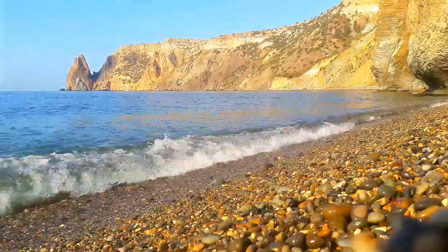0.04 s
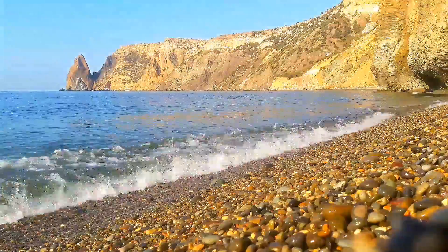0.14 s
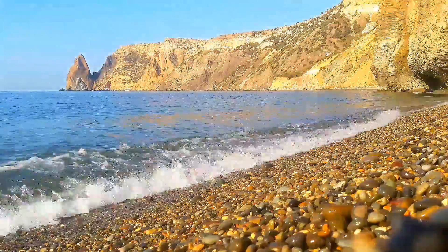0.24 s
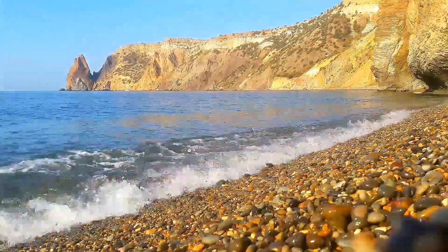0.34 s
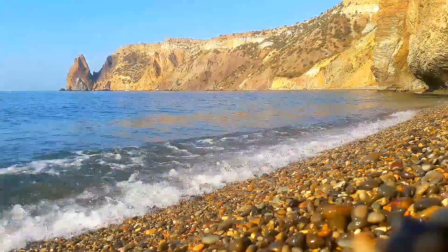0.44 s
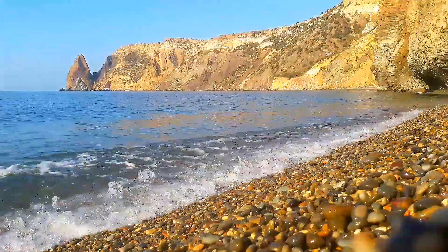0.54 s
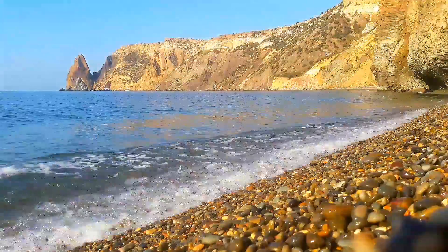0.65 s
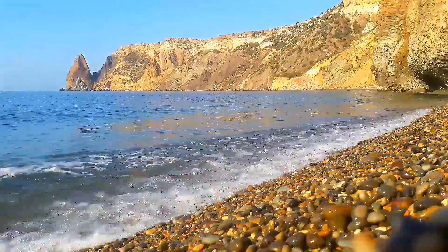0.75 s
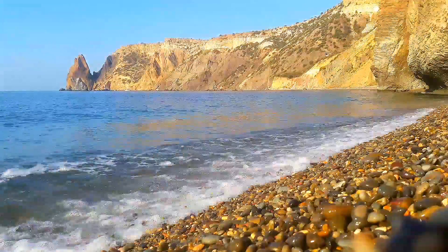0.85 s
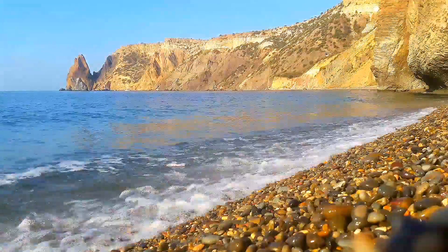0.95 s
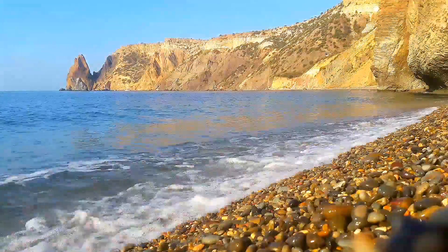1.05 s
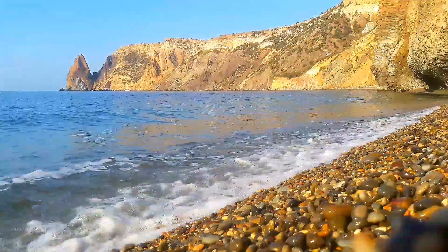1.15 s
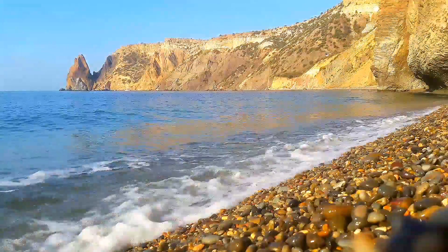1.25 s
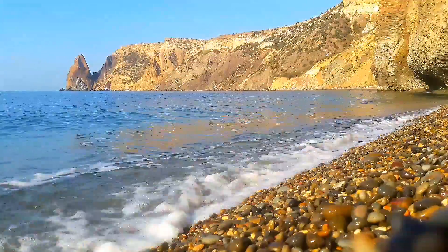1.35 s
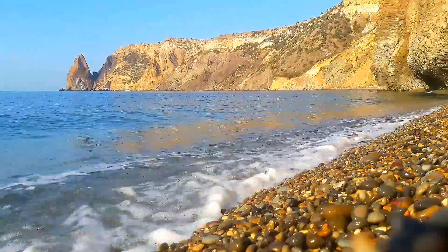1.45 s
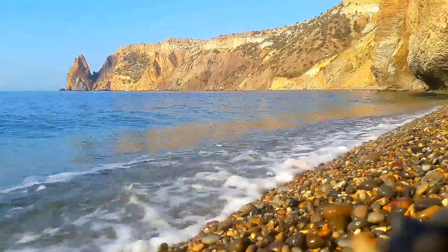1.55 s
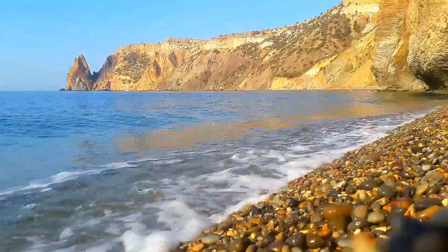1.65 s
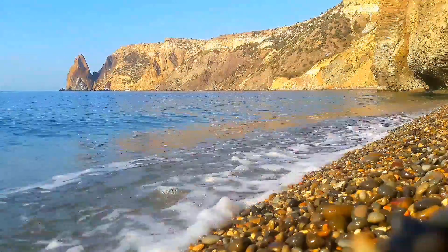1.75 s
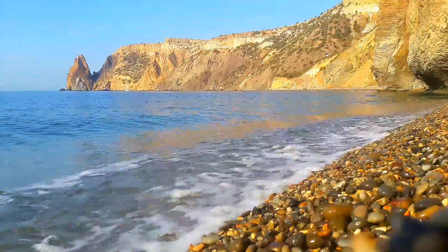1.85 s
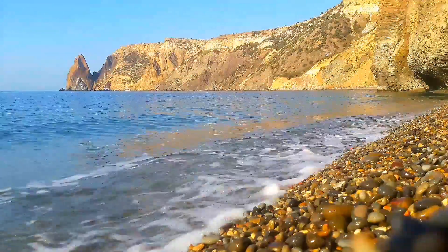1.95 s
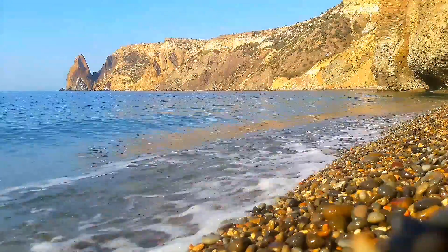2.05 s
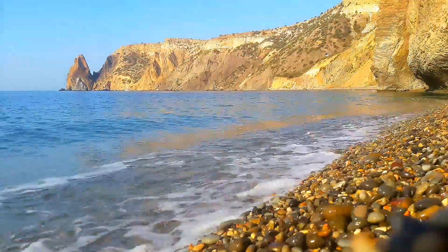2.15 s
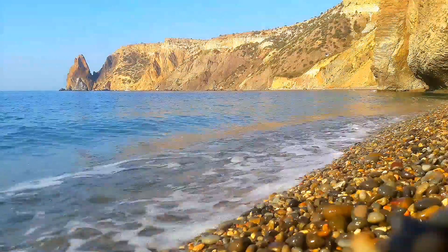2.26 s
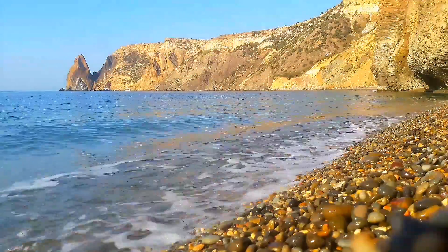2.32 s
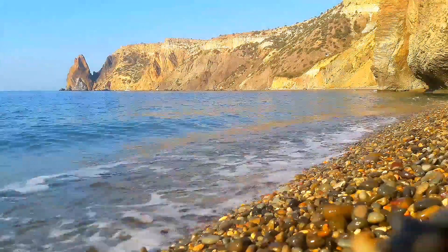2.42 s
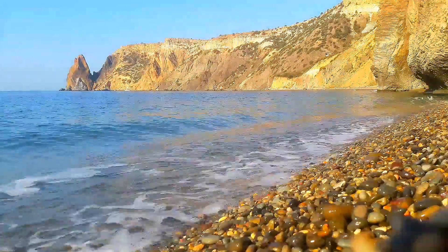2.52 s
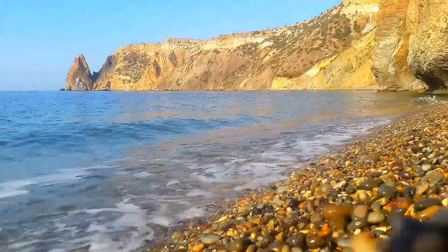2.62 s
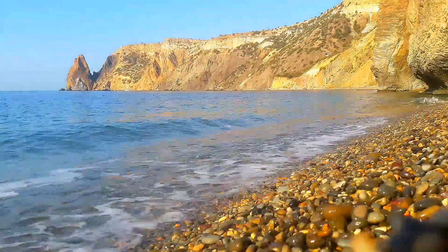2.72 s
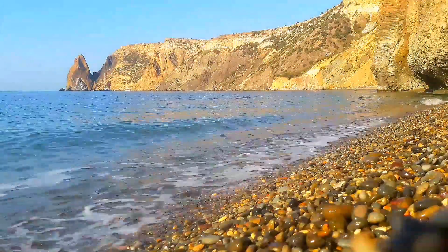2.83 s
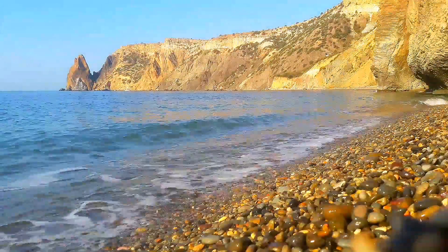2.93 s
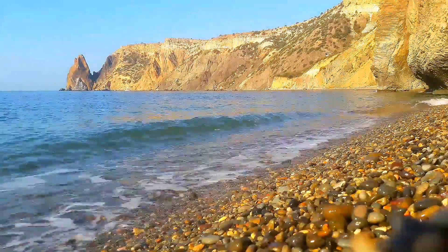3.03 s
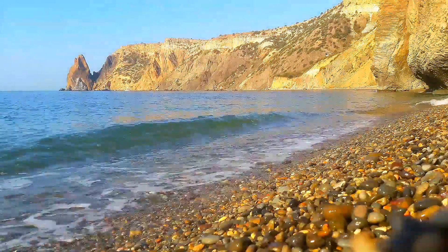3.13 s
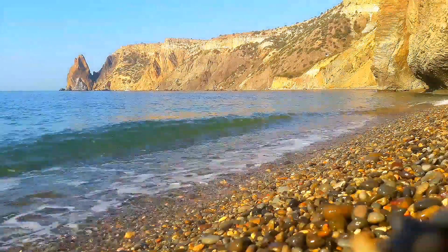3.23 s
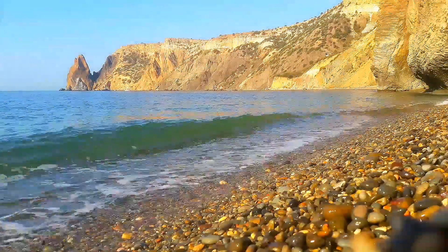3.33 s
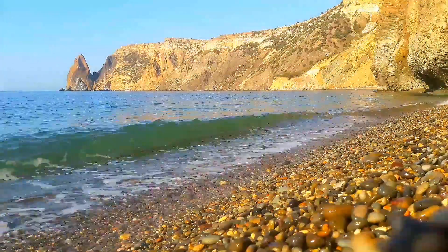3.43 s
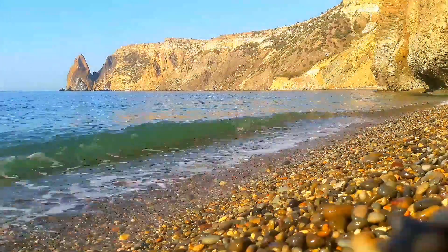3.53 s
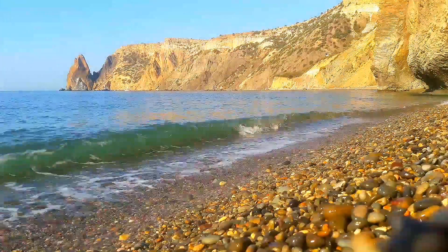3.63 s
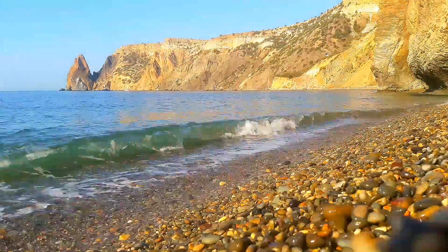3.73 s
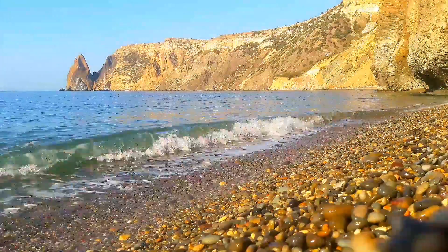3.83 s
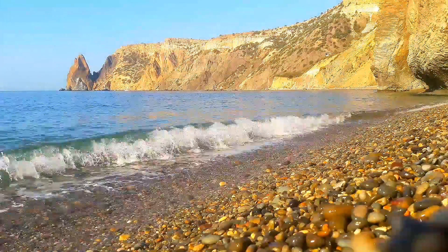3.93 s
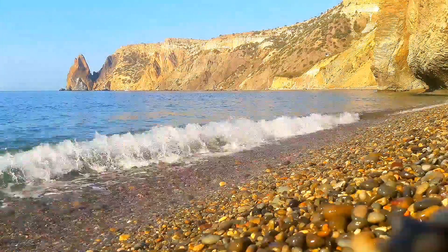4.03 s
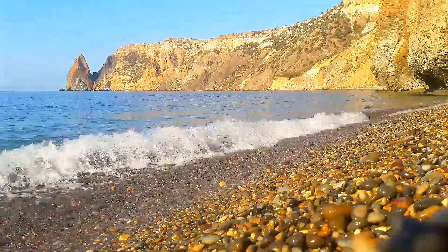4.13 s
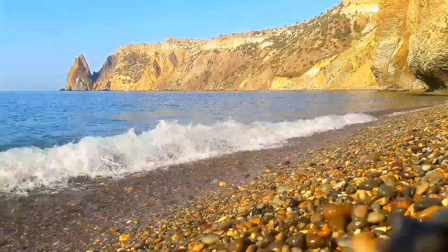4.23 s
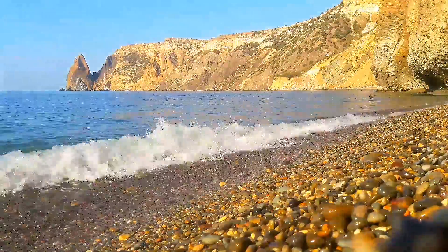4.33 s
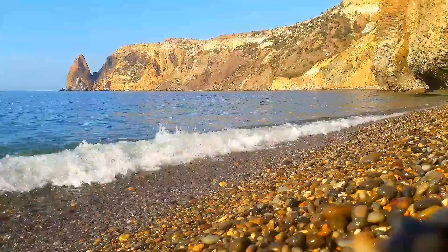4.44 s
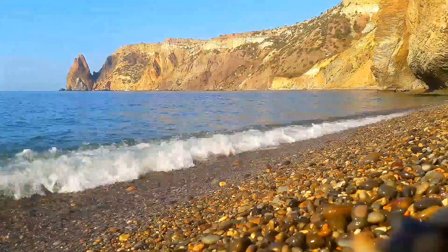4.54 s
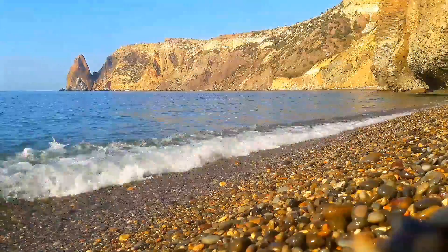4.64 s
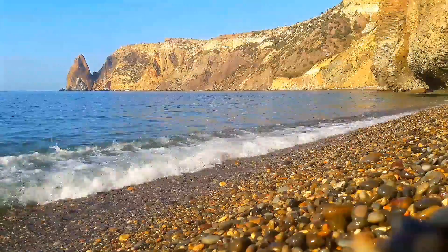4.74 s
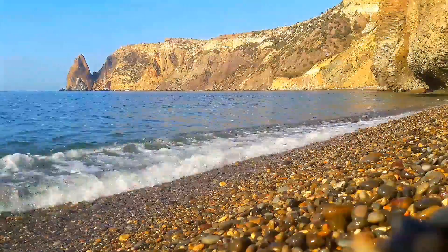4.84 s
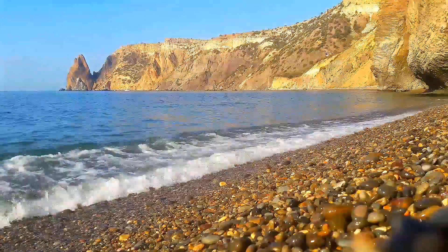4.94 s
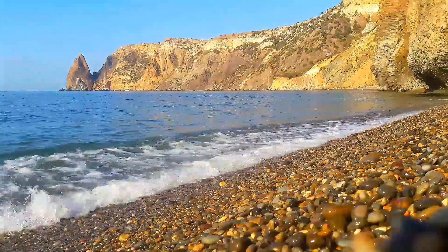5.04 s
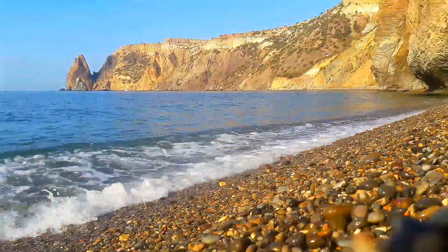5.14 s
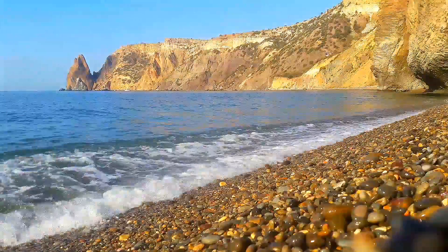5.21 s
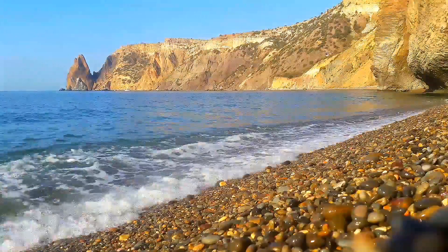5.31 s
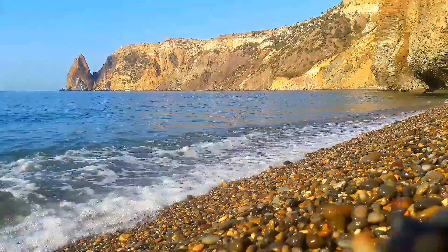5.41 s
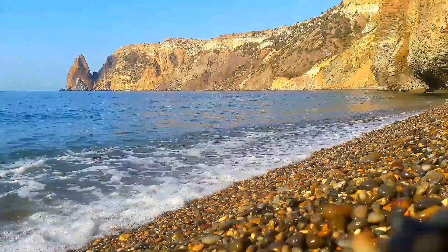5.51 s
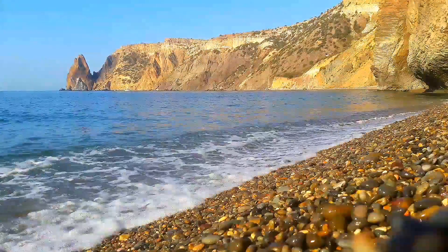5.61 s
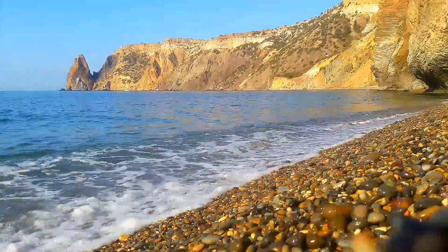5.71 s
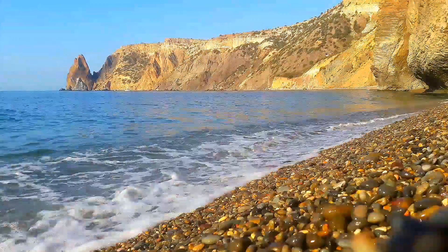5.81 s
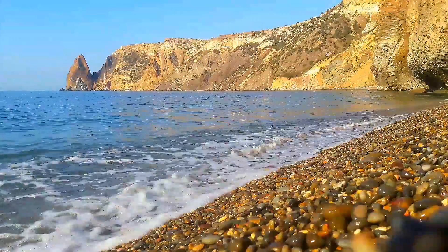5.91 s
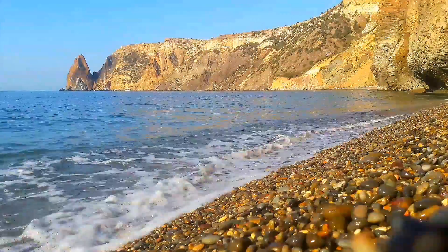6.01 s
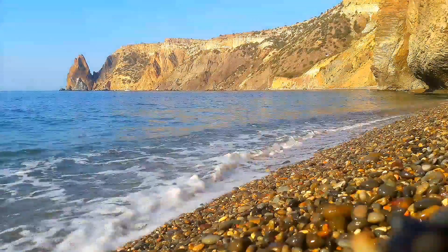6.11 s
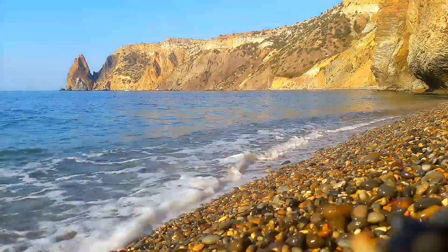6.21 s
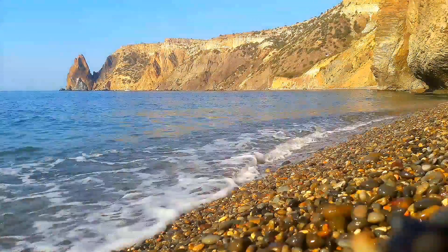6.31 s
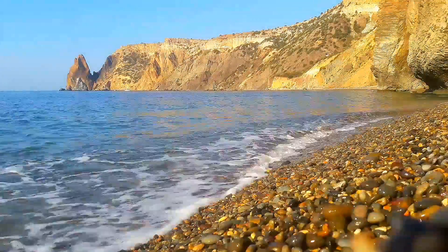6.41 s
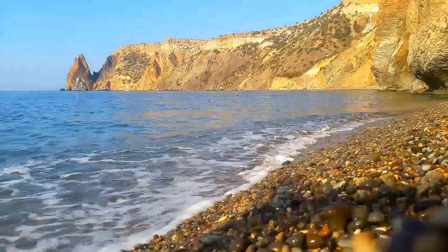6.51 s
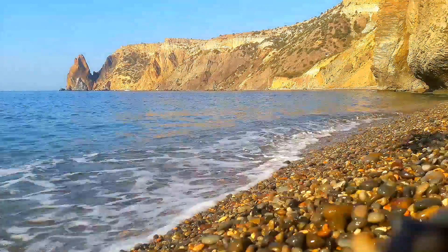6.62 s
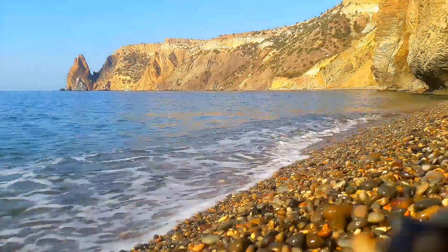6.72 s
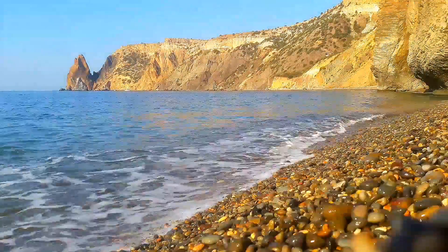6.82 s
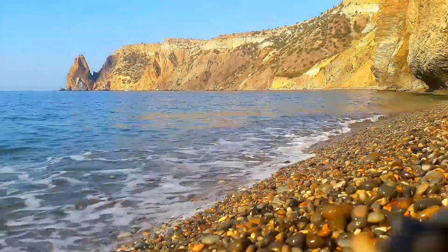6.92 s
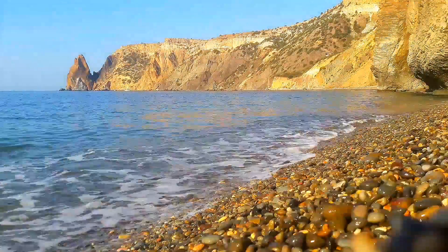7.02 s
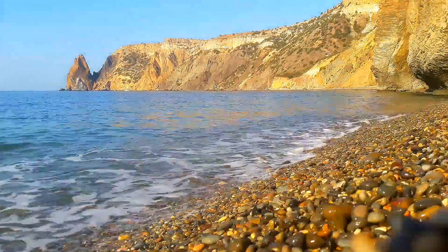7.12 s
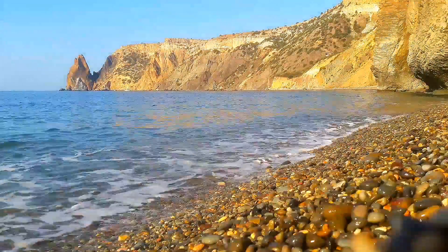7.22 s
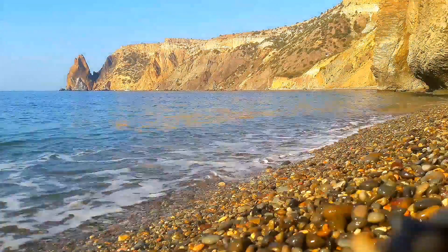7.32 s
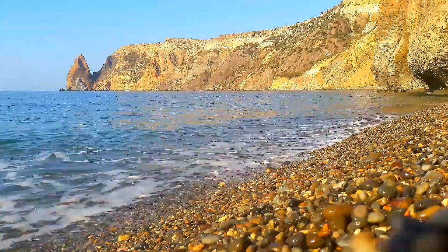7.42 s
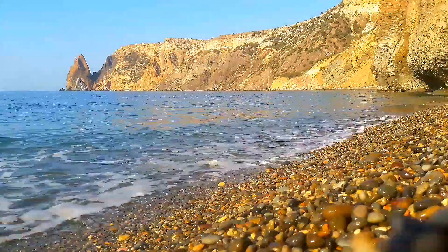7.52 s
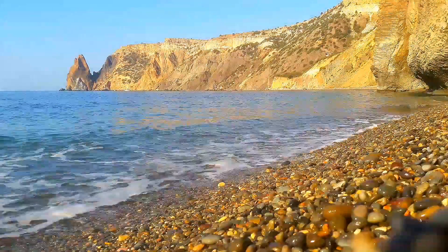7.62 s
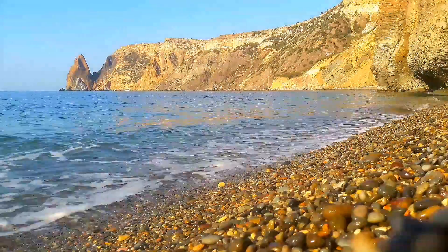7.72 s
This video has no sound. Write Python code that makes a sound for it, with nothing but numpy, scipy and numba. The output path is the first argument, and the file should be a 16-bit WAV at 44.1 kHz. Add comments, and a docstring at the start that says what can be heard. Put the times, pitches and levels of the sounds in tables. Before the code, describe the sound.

A small wave breaks on a steep pebble beach at once, with low thumps, a bubbly roar and hollow gulps. It surges again more softly, then drains with rattling pebbles and fizz. After a quiet lull, a second breaker crashes just past four seconds, washes up, and fades away. Outdoors, stereo microphone lying low on the stones, faint hiss.

```python
"""Steep pebble beach: small waves break a few metres to the left of a phone lying on the stones.
Breakers trap clouds of bubbles that roar over low thumps; large air pockets gulp.
The backwash drags pebbles that rattle and knock, foam fizzes, drops of spray tick, a faint wind rumbles.
Roar, rattle and fizz are swarms of short ringing grains, each from its own spot on the shore:
most reach the right port a little late. Microphone hiss and wind are filtered noise."""
import sys
import numpy as np
from scipy import signal
from scipy.fft import rfft, irfft, next_fast_len
from scipy.io import wavfile
from scipy.ndimage import uniform_filter1d
from numba import njit

SR = 44100
rng = np.random.default_rng(int(sys.argv[2]) if len(sys.argv) > 2 else 0)


def volts(x):
    """Linear amplitude factor 10**(x/20) for a level x in dB, scalar or array-like."""
    e = np.asarray(x, float) / 20
    return 10 ** e


def unload_audio(sound):
    """Save the sound as a 16-bit wav file, at the path given as the first command line argument."""
    columns = np.transpose(np.atleast_2d(sound))
    # keep every value between -1 and 1, then stretch to whole-number steps
    steps = np.round(np.clip(columns, -1, 1) * 32767)
    wavfile.write(sys.argv[1], SR, steps.astype(np.int16))


N = 342216  # samples
STEP = 32  # samples per control step


def breakers():
    """Trapped bubbles ring in a patchy roar, the falling crest thumps below, air pockets gulp as they close."""
    # crests falling on the stones: t/s, thump level/dB before flicker
    falls = [(.1, -32), (.21, -32), (.45, -38), (.67, -33.5), (1.25, -39.5), (1.42, -43.5), (2.1, -45),
             (2.55, -38.5), (3.02, -45), (3.84, -32.5), (3.95, -37), (4.08, -33.5), (4.23, -22.5),
             (4.42, -31), (5.17, -34), (5.73, -51.5), (6.25, -47), (6.5, -45), (6.649, -42.5),
             (6.85, -41.5), (7.15, -48), (7.45, -51.5), (7.7, -45.5)]
    # large air pockets closing: t/s, level/dB, starting f/Hz, cycles/1, rise/1 (f ends 1 + 0.69 rise times higher)
    gulps = [(.228, -18.5, 397, 13.4, .1), (.236, -24, 1040, 15.3, .1), (0.454, -21, 205, 9.8, .1),
             (0.504, -28.5, 320, 8.4, .05), (.532, -22.5, 298.5, 39, 0.99), (1.232, -11.5, 192, 4.2, .1),
             (1.421, -17, 117, 2.8, .1), (4.45, -18, 247.6, 29, 0.62)]
    slope_db_per_s, under_roar_db = 230, -17.5

    roar_db, bubble_hz, place = clouds()
    even = np.zeros(N)
    patchy_db = 1.05 * walk(9)
    roar = swarm(roar_db + patchy_db, even, place, bubble_hz, 0.922, 11.61, 0.28,
                 uneven_db=0.5, count=30000)

    s, db = np.transpose(falls)[:, :, None]
    falls_db = held((db - slope_db_per_s * abs(clock() - s)).max(axis=0))
    thump_db = np.maximum(falls_db, roar_db + under_roar_db)
    flicker_db = 3 * walk(7)
    thump = swarm(thump_db + flicker_db, even, place, np.full(N, 105.), 0.43, 12.3, 0.12,
                  uneven_db=3.5, count=1500)

    s, db, hz, cycles, rise = np.transpose(gulps)
    pockets = single(s, db, place[0], hz, cycles, rise, 0 * s)
    return roar + thump + pockets


def clouds():
    """Small bubbles start a plunge, big ones rule the crest, small ones outlast them."""
    # surges of bubbles: start t/s, crest t/s, crest level/dB, time to fade 20 dB/s,
    # right-port delay/ms once the wave has run its full way
    roars = [(-.3, .27, -26.5, 0.77, 0.31), (.42, .54, -30, 0.88, 0.17), (1.16, 1.4, -31, 0.64, 0.38),
             (2.33, 2.75, -44, 2, 0.23), (3.71, 4.22, -26, 1.0, .3), (4.26, 4.43, -24.5, .5, 0.36),
             (4.9, 5.0, -29.5, 0.36, 0.193), (4.95, 5.18, -26, .72, 0.36), (5.9, 6.55, -43, 1.34, 0.293),
             (7.2, 7.45, -51, 3, 0.28)]
    bubble_hz, far_bubble_hz = 450.8, 430
    plunge_octaves, drain_octaves_per_db = 1.35, 0.0423
    spread_ms, widens_ms_per_s = 0.0685, 0.065
    far_ms, far_spread_ms = 0.16, 0.18

    roar_db, blend, spot_ms, grown, past_s, faded_db = surges(roars, swell=0.64, fade=1.2, far_db=-53.5)
    plunging = plunge_octaves * (1 - grown) ** 2
    draining = drain_octaves_per_db * np.minimum(faded_db, 30)
    pitch_hz = blend(bubble_hz * 2 ** (plunging + draining), far_bubble_hz)
    centre_ms = blend(spot_ms * run_along(), far_ms)
    wide_ms = spread_ms * grown + widens_ms_per_s * np.maximum(past_s, 0) + spread_ms
    return roar_db, pitch_hz, (centre_ms, blend(wide_ms, far_spread_ms))


def backwash():
    """Dragged pebbles roll and knock together, each ringing a few cycles."""
    # single pebbles knocking close by: t/s, level/dB, f/Hz, left minus right/dB before place and port colour
    knocks = [(2.5551, -39.5, 2310, 0), (2.88, -28.5, 2000, -2), (3.6521, -33, 2060, 13),
              (3.692, -18, 2730, -1.0), (3.696, -25, 2320, 0.0), (7.2034, -37, 2650, 0.5),
              (7.5383, -33, 3390, 1.0), (7.578, -38, 1736, 1.5)]

    rattle_db, pebble_hz, place = stones()
    # the weaker the drag, the more single stones stand out
    stray_db = np.clip(1.5 - .05 * (rattle_db + 30), 1, 3)
    patchy_db = 0.74 * walk(14)
    rattle = swarm(rattle_db + patchy_db, np.zeros(N), place, pebble_hz, 0.5, 4.97, 0.,
                   uneven_db=stray_db, count=60000)
    s, db, hz, lean_db = np.transpose(knocks)
    return rattle + single(s, db, place[0], hz, 16.0, 0., lean_db)


def stones():
    """Ever lighter stones roll, so the ring climbs around each crest; stragglers lie scattered."""
    # drags of each surge: start t/s, crest t/s, crest level/dB, time to fade 20 dB/s, ring at crest f/Hz
    drags = [(-.3, .25, -26, 1.33, 1352), (.4, .8, -31, .5, 1500), (1.14, 1.2, -29.5, .5, 1850),
             (1.2, 1.5, -27, 0.71, 1820), (2.35, 3.11, -35, 1.2351, 2597), (3.74, 3.86, -35.5, 1.5, 1750),
             (3.8, 4.45, -28.5, 1.13, 1350), (4.8, 5.19, -25.5, 0.65, 1424), (5.4, 5.72, -34, 0.57, 1660),
             (6.2, 6.55, -51, 0.5, 1690), (7.1, 7.3, -55.5, 2, 2820)]
    climb_octaves_per_s, far_hz = 0.309, 1810
    run_ms, far_ms = 0.4, 0.24  # right-port delay
    spread_ms, far_spread_ms = 0.0493, .27
    running_ms, widen_ms_per_s2 = 0.42, 0.13

    rattle_db, blend, hz, _, past_s, _ = surges(drags, swell=0.74, fade=1.41, far_db=-62.5)
    pitch_hz = blend(hz * 2 ** (climb_octaves_per_s * np.clip(past_s, -1, 1)), far_hz)
    run = run_along()
    # a running wave covers more shore
    covered_ms = running_ms * run * (1 - run)
    scattered_ms = widen_ms_per_s2 * np.maximum(past_s, 0) ** 2
    wide_ms = spread_ms + covered_ms + scattered_ms
    return rattle_db, pitch_hz, (blend(run_ms * run, far_ms), blend(wide_ms, far_spread_ms))


def foam():
    """Tiny bubbles burst by the thousand, in gusts; a few drops of spray tick near the left port."""
    # foam left by each surge: start t/s, crest t/s, crest level/dB, time to fade 20 dB/s,
    # left minus right/dB of the coarse fizz before place and port colour
    foams = [(-.3, .26, -31, 0.81, -2), (1.135, 1.2, -36, 0.36, 2), (1.2, 1.44, -39.5, 0.87, 0),
             (2.3, 2.7, -46.5, 0.5, -.5), (2.6, 3.35, -38.5, 2.9, 0.52), (3.8, 3.87, -38.5, 1.6, -2),
             (3.8, 4.45, -34.5, 1.15, -3.5), (4.92, 4.99, -32.5, 0.31, -4), (4.97, 5.13, -32, .5, -2),
             (5.2, 5.36, -38, .33, 0), (5.85, 6.38, -52, 0.9, -1.5), (7.03, 7.4, -48.5, 1.4, 0.5)]
    # drops of spray ticking on the stones: t/s, level/dB, f/Hz
    drops = [(1.4471, -34.5, 12300), (1.4729, -12, 12300), (1.4784, -18, 13000), (1.6117, -19.5, 11200),
             (2.612, -31.5, 8450), (2.6894, -34, 8620), (2.7786, -33, 12400)]

    fizz_db, blend, lean_db, *_ = surges(foams, swell=0.6, fade=1.55, far_db=-57.5)
    pan_db = blend(lean_db, -2.3)
    gust_db = 0.5 * walk(14) + 0.5 * walk(5)
    place = stones()[2]
    # fading foam loses its larger bubbles first
    thinning_db = 0.09 * (fizz_db + 39)
    coarse = swarm(fizz_db + gust_db + thinning_db, pan_db, place, np.full(N, 4000.), 0.61, 3.035, 0.07,
                   uneven_db=1.5, count=80000)
    fine = swarm(fizz_db + gust_db + 6.0, 1.35 * pan_db, place, np.full(N, 11000.), 0.43, 3.5, 0.124,
                 uneven_db=2.0, count=150000)
    s, db, hz = np.transpose(drops)
    ticks = single(s, db, place[0], hz, 15.0, 0., 9.5 + 0 * s)
    return coarse + fine + ticks


def hiss():
    """Steady faint microphone hiss: noise centred near 12 kHz, unrelated on the two ports."""
    band = signal.butter(1, [10000, 15000], "band", fs=SR, output="sos")
    noise = signal.sosfilt(band, rng.standard_normal((2, N)))
    return noise / noise.std() * volts(-49.5)


def wind():
    """Faint air rumble right on the ports: low noise that swells differently on each."""
    band = signal.butter(2, [20, 60], "band", fs=SR, output="sos")
    low = signal.sosfilt(band, rng.standard_normal((2, N)))
    swell_db = 10.0 * np.array([walk(5.4), walk(11)])
    return low / low.std() * volts(-68 + swell_db)


def run_along():
    """Each wave breaks straight ahead, then runs to the left: how far the latest has run, 0 to 1."""
    breaks_s = np.array([[-0.13], [3.7]])
    run_s, ease = 0.41, 1.523
    since = clock() - breaks_s
    latest_s = np.where(since > 0, since, np.inf).min(axis=0)
    return 1 - np.exp(-latest_s ** ease / run_s ** ease)


def surges(rows, swell, fade, far_db):
    """Overlapping surges over a far wash: level, a power-weighted blender, last column, growth, age, fading.

    Amplitude grows as time ** swell, dB fall as time ** fade.
    """
    start, crest, db, fade_s, trait = np.transpose(rows)[:, :, None]
    grown = np.clip((clock() - start) / (crest - start), 1e-6, 1)
    past_s = clock() - crest
    faded_db = 20 * (np.maximum(past_s, 0) / fade_s) ** fade
    power = (grown ** swell * volts(db - faded_db)) ** 2
    far_power = volts(far_db) ** 2
    total = power.sum(axis=0) + far_power

    def blend(near, far):
        """Mean of the near and far values, each weighted by its power."""
        return held(((power * near).sum(axis=0) + far_power * far) / total)

    return held(10 * np.log10(total)), blend, trait, grown, past_s, faded_db


def swarm(level_db, pan_db, place, hz, octaves, cycles, rise, uneven_db, count):
    """Many grains at random moments and spots; pitches scatter round hz, a few grains stand out."""
    astray = .06  # share of grains from anywhere
    shade_db_per_ms = 9.5  # the port reached later hears less
    start = np.sort(rng.integers(0, N, count))
    pitch, spot, side, other = rng.standard_normal((4, count))
    f = np.clip(hz[start] * 2 ** (octaves * pitch), 70, .4 * SR)

    size = volts((uneven_db + np.zeros(N))[start] * np.minimum(rng.exponential(1, count), 5.5))
    # even out the energy of grains whatever their pitch, then scale the sum to about the level asked for
    size *= np.sqrt(f / cycles / uniform_filter1d(size ** 2, size=500))
    energy = np.sum(size ** 2 * cycles / f)
    size *= np.sqrt(4 * np.log(300) * N / SR / energy) * volts(level_db[start])

    centre_ms, spread_ms = (c[start] for c in place)
    strays = rng.random(count) < astray
    lag_ms = np.clip(np.where(strays, 0.311 * other, centre_ms + spread_ms * spot), -1, 1)
    lean = volts((pan_db[start] + shade_db_per_ms * lag_ms) / 2 + 1.33 * side)
    full = np.ones(count)
    return ring(start, lag_ms * SR / 1e3, f, cycles * full, rise * full, size * lean, size / lean)


def single(s, db, lag_ms, hz, cycles, rise, pan_db):
    """Grains at given moments, from wherever the water is busy just then."""
    full, start = np.ones(len(s)), (s * SR).astype(np.int64)
    return ring(start, lag_ms[start] * SR / 1e3, hz, cycles * full, rise * full,
                volts(db + pan_db / 2), volts(db - pan_db / 2))


@njit
def ring(start, lag, hz, cycles, rise, left, right):
    """Decaying sines that climb in pitch; the right port hears each one lag samples later."""
    out = np.zeros((2, N + 32768))  # 64 spare samples ahead, for negative lags
    for g in range(len(start)):
        steps = int(cycles[g] * SR / hz[g]) + 2
        w = 2 * np.pi * hz[g] / SR
        turn = np.exp(1j * w - np.log(300) / steps)  # falls to 1/300 by the end
        bend = np.exp(1j * w * rise[g] * np.log(2) / steps)
        whole = int(np.floor(lag[g]))
        late = np.exp(1j * w * (whole + 1 - lag[g]))  # the fraction of a sample, as phase
        z = 1 + 0j
        for i in range(steps):
            push = min(1., (i + 1) * hz[g] / SR)  # the blow lasts one cycle
            out[0, start[g] + 64 + i] += left[g] * push * z.imag
            out[1, start[g] + 65 + whole + i] += right[g] * push * (z * late).imag
            z *= turn
            turn *= bend
    return out[:, 64:N + 64]


def walk(rate):
    """Slow random drift: levels held 1 / rate s and slewed twice."""
    k = int(SR / rate)
    levels = np.repeat(rng.standard_normal(N // k + 1), k)
    return 0.98 * uniform_filter1d(uniform_filter1d(levels, k), k)[:N]


def clock():
    """Times of the control steps in seconds."""
    return np.arange(0, N, STEP) / SR


def held(control):
    """A control held at every sample until its next step."""
    return np.repeat(control, STEP)[:N]


def scene():
    """The water's sounds at the two ports, over a faint microphone hiss."""
    return breakers() + backwash() + foam() + hiss()


def top_cut(x):
    """Nothing passes above the cut-off."""
    return signal.sosfilt(signal.butter(12, 15780, fs=SR, output="sos"), x)


def record(dry):
    """Each port colours the water and hiss; the right one is shaded above 7 kHz; a light wind stirs both."""
    # colour of the two microphone ports: f/Hz, left level/dB, right level/dB
    ports = [(30.2, -19, -41), (65, -16, -12), (89, -1, 0), (197, 1.24, 3.24), (2000, 11.5, 12),
             (4153, 6, 6.5), (6140, 1, -0.5), (7215, -0.5, 0), (8160, 3.5, -29.5), (8360, 3, -37.5),
             (9700, -2.5, -29), (12300, -0.5, -17), (14000, -3, -20), (15700, -2.5, -18)]
    hz, *colour_db = np.transpose(ports)
    size = next_fast_len(N + 4096)
    log_hz = np.log(np.arange(1, size // 2 + 2) * SR / size)
    gain = volts(np.array([np.interp(log_hz, np.log(hz), c) for c in colour_db]))
    coloured = irfft(rfft(dry, size) * gain, size)[:, :N]
    return top_cut(coloured + wind())


dry = scene()
out = record(dry)
unload_audio(out)
```